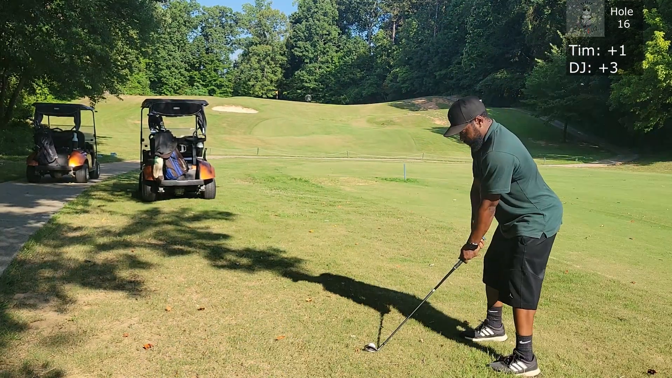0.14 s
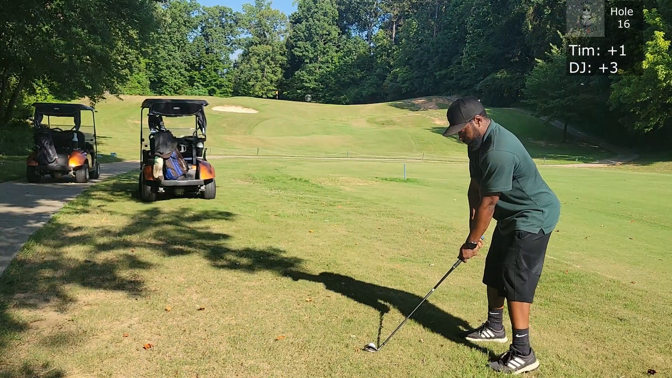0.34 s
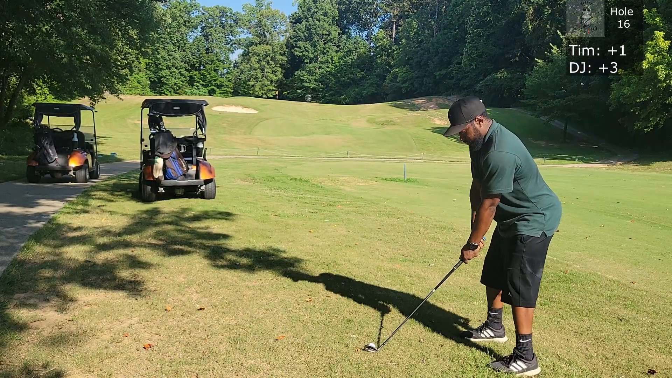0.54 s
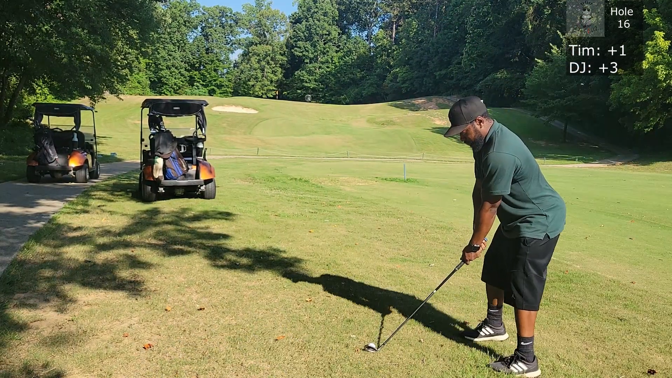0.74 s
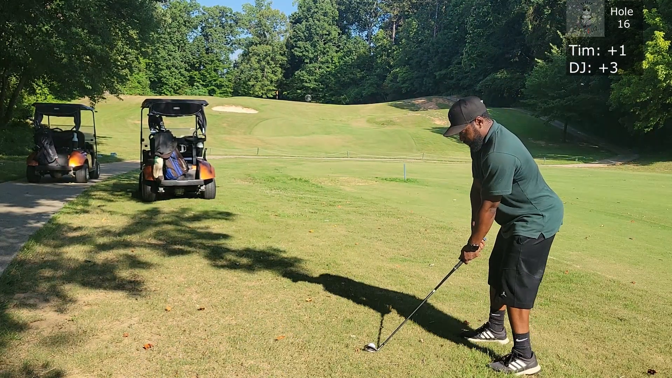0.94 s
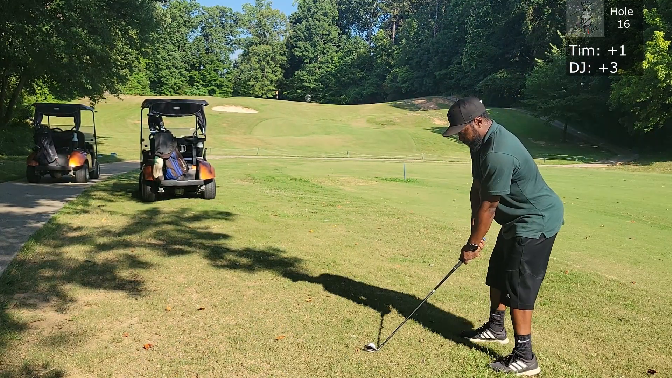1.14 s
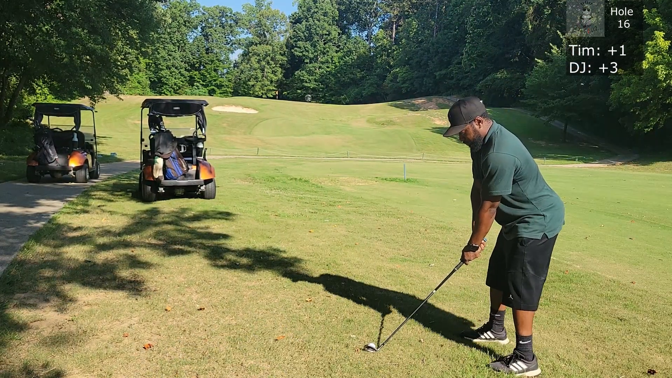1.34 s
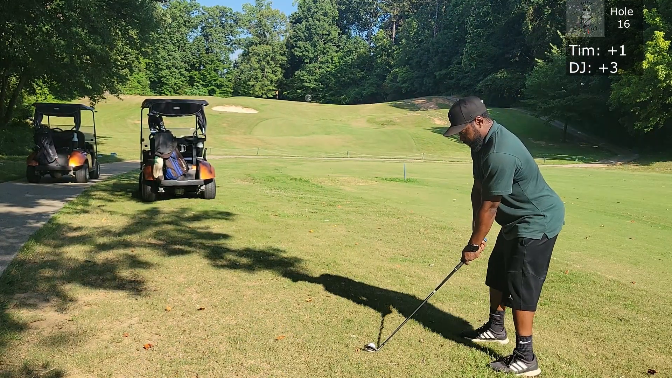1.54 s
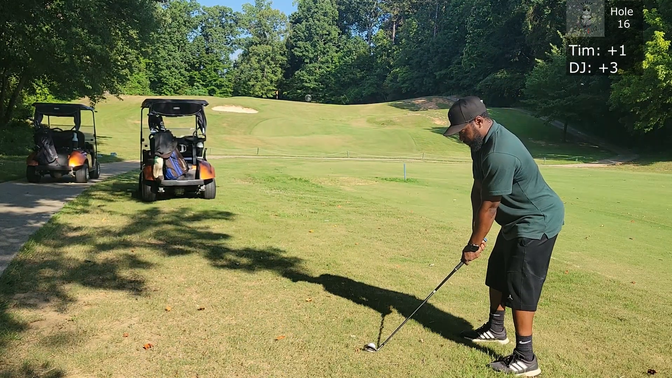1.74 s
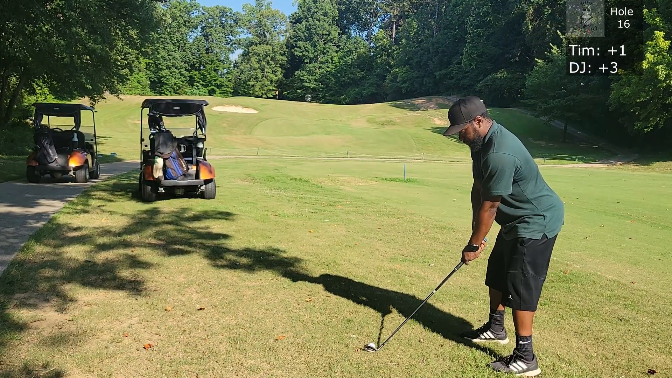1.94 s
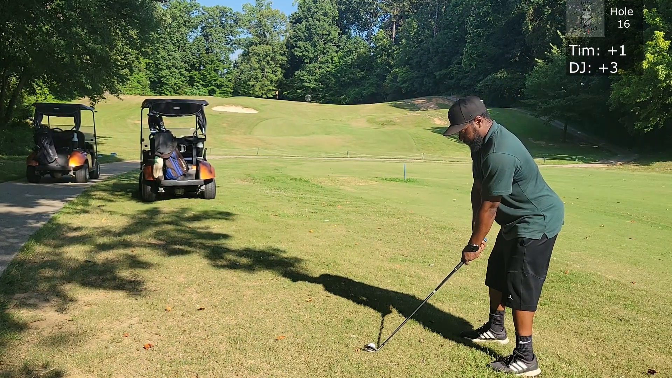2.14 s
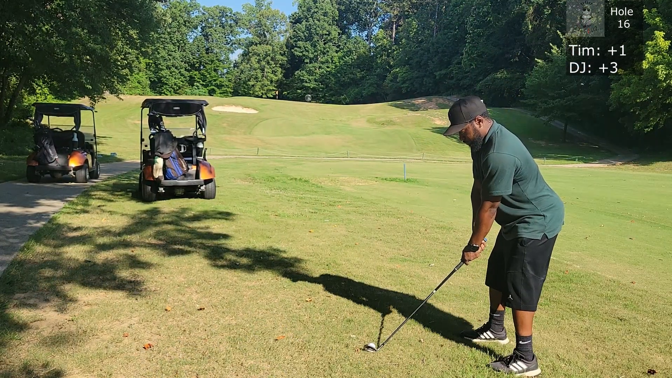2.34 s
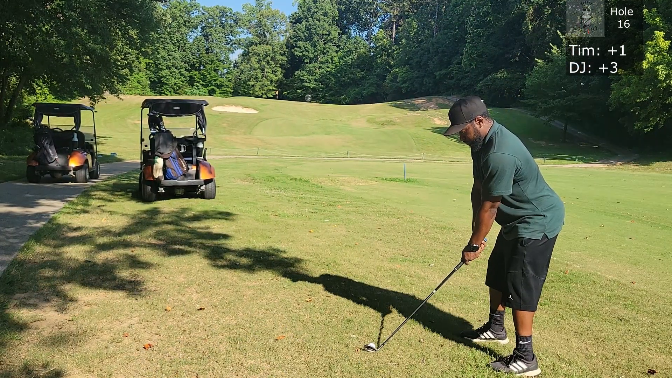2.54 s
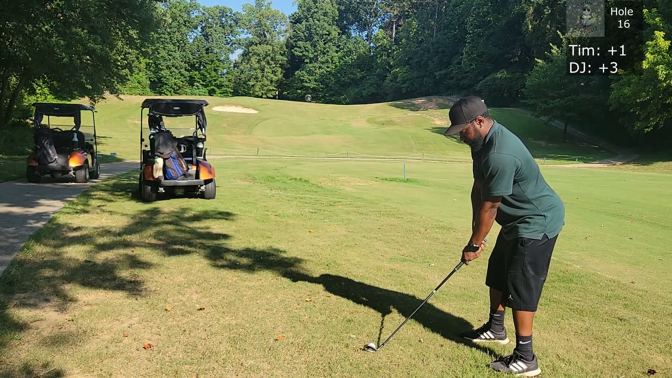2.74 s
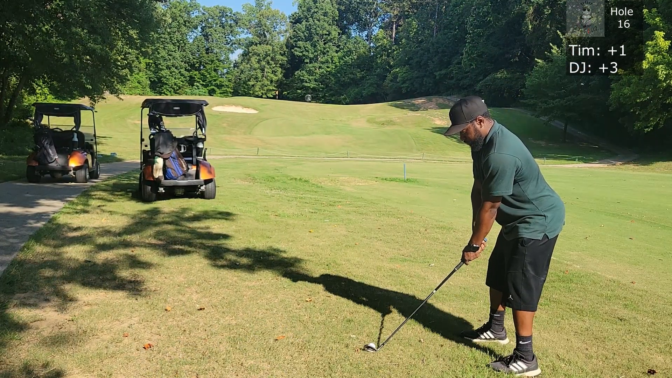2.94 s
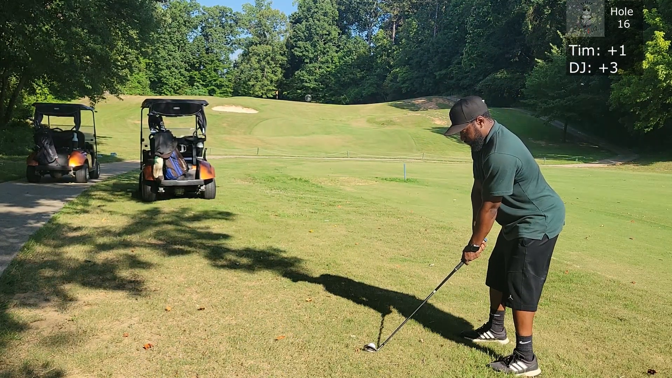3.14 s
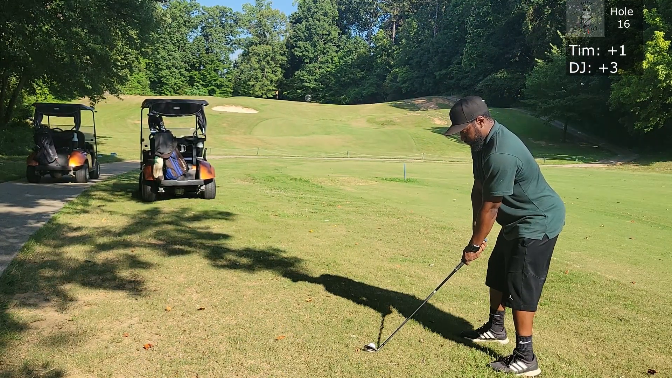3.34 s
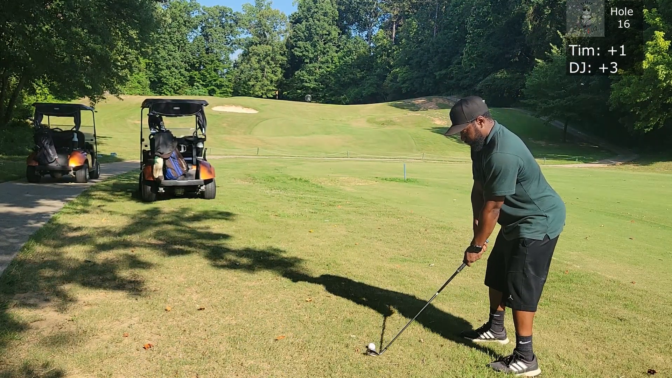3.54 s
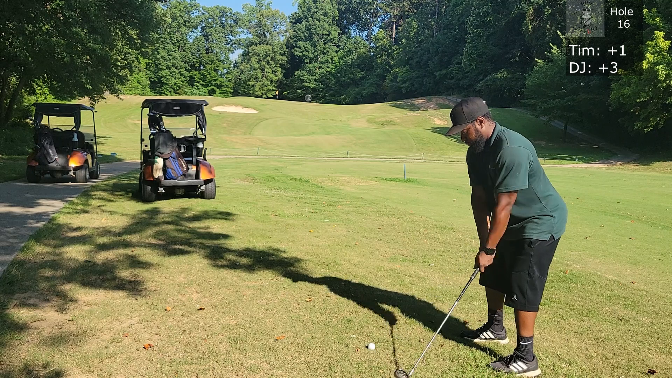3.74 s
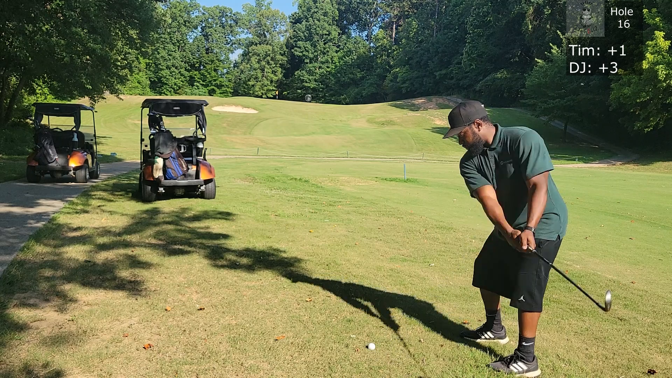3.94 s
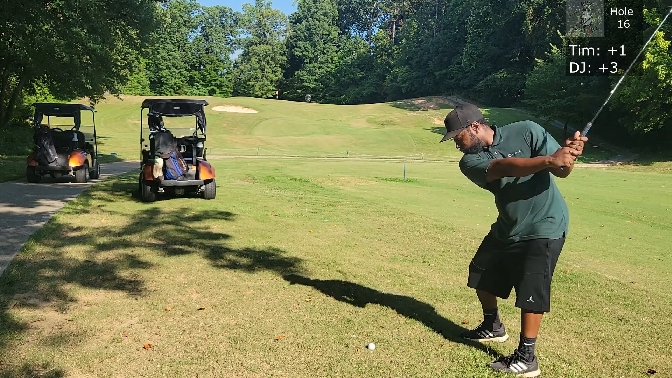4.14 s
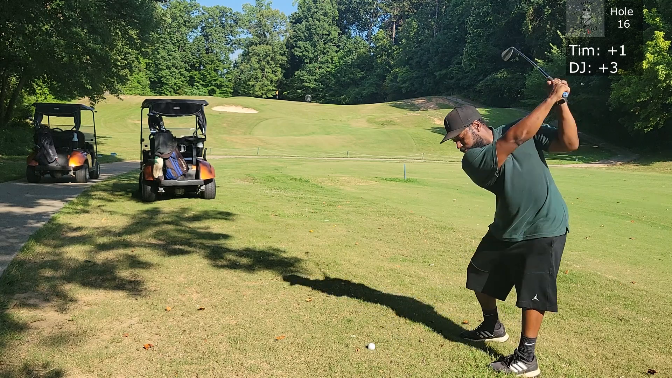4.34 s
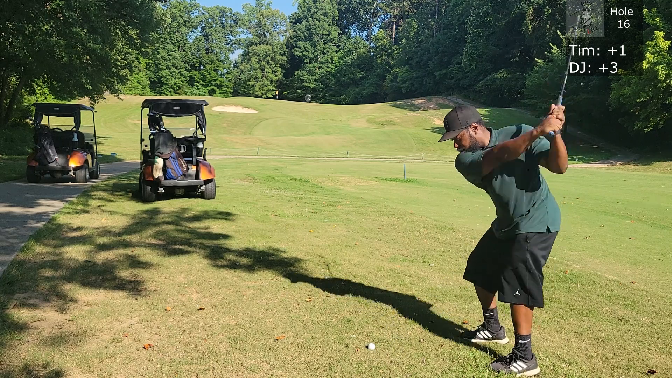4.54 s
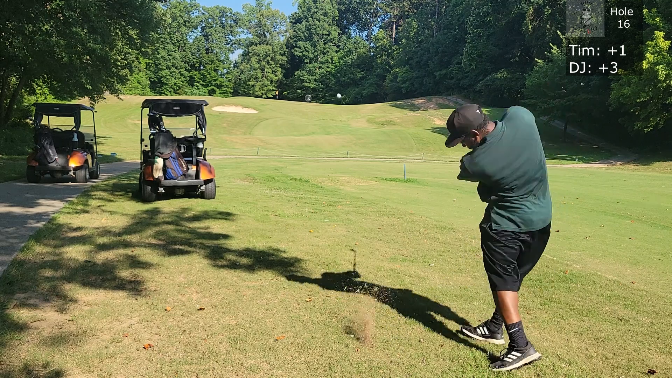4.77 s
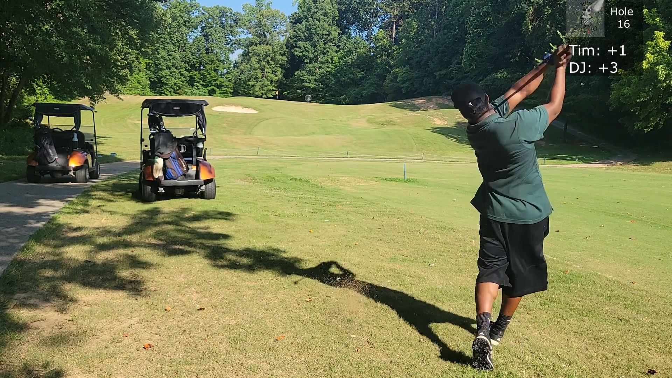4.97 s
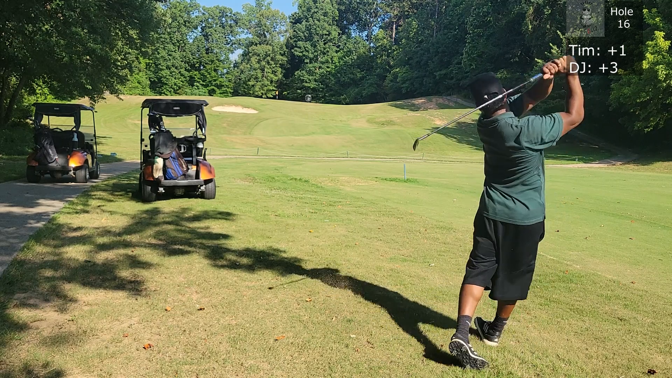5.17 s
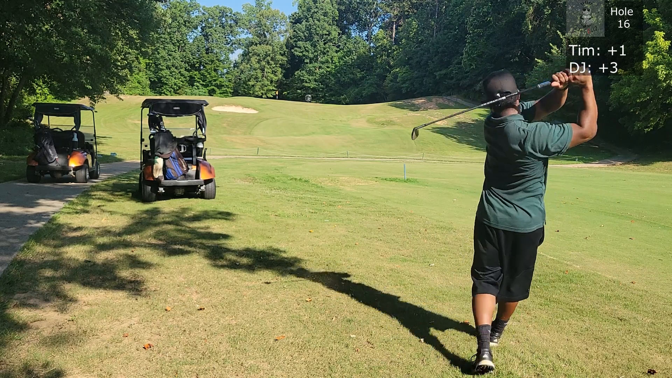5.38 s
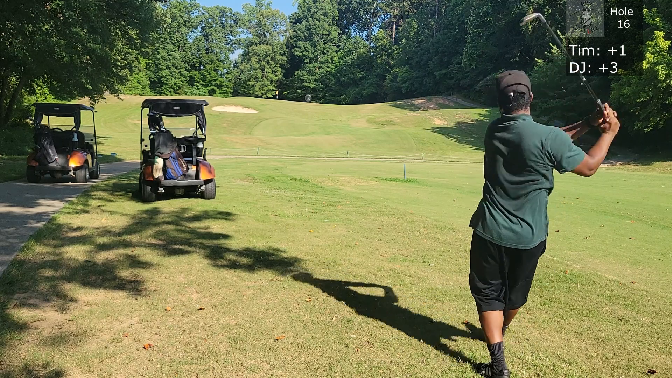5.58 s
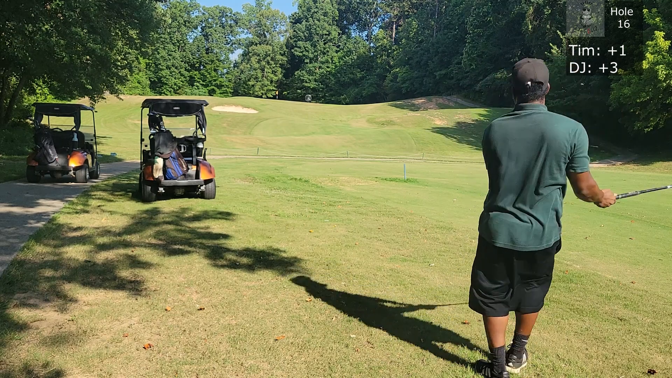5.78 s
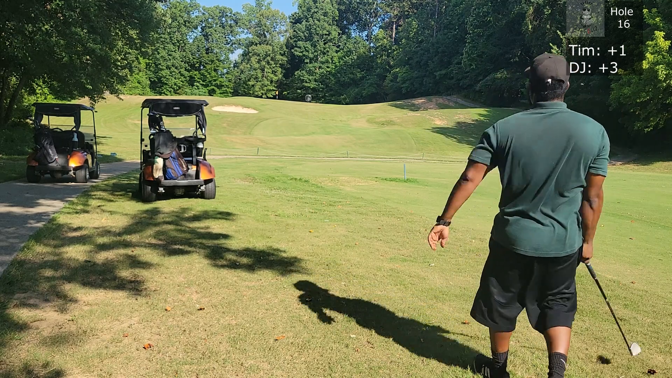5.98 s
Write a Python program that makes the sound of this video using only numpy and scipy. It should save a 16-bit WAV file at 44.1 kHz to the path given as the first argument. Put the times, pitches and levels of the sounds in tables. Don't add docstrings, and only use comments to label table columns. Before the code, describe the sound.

A faint far vehicle drone fades away at the start, leaving a mower hum, steady insects and light breeze. A soft tap on the ground comes in the first half. After a long quiet wait, an iron whooshes briefly and cracks a golf ball off grass, very loud against the background, with torn turf and gritty soil settling. Then only the calm outdoors remains, heard in wide, dry stereo from nearby.

```python
import sys
import numpy as np
from scipy import signal
from scipy.fft import rfft, irfft, next_fast_len
from scipy.io import wavfile
from scipy.ndimage import map_coordinates

SR = 44100
rng = np.random.default_rng(int(sys.argv[2]) if len(sys.argv) > 2 else 0)


def magnitude_from_level(level_db):
    exponent = np.asarray(level_db, float) / 20
    return 10 ** exponent


def inscribe(sig):
    pcm = np.round(np.clip(np.atleast_2d(sig).T, -1, 1) * 32767)
    wavfile.write(sys.argv[1], SR, pcm.astype(np.int16))


N = 265041
T = np.arange(N) / SR

# [f/Hz, density/dB]
CHORUS = [(1470, -35.5), (2500, -15.5), (4270, -9), (5480, -10.5), (6900, -16), (7150, 2), (7400, -4.5),
          (7850, 1), (8300, -1.5), (8800, -13.5), (9300, -29), (10300, -38), (13000, -25.5), (16000, -24)]
# [full from t/s, until t/s, level/dB]
LEAVES = [
    (2.9, 3.2, -80),
    (4.7, 5.05, -79),
    (5.6, 6.1, -76.5),
]
# [t/s, cycle f/Hz]
SPEED = [(0, 9.045), (1.1, 9.048), (1.4, 9.056), (3.4, 9.056), (3.7, 9.033), (6.1, 9.03)]
ORDER = [4, 6, 8, 8.9965, 10, 12, 14, 16, 17.993, 20, 22, 24, 26, 26.99, 28, 30, 32, 34]
ORDER_DB = [-66.5, -60, -64.5, -46, -52.5, -58, -67, -64, -63.5, -66, -69, -72.5, -77.5, -78.5, -81.5,
            -81.5, -84.5, -82.5]
# [t/s, level/dB]
LOAD = [
    (0, 0),
    (1.2, .3),
    (2.5, .6),
    (3.1, -2.5),
    (4.3, -3),
    (4.7, .3),
    (6.01, 0),
]
# [f/Hz, density/dB]
RUMBLE = [(10, -19), (24, -19), (33, -28), (50, -2), (65, 0), (100, -5), (180, -5.5), (215, -16),
          (320, -33.5), (500, -55)]
# [f/Hz, density/dB]
HUM = [(160, -36), (270, -6), (371, -0.5), (494, -5), (739, -1.5), (904, -1.5), (994, -7), (1170, -2.5),
       (1300, -7.5), (2160, -13), (3400, -17.5), (4420, -38), (7480, -120)]
# [f/Hz, left-right likeness]
HUM_ALIKE = [(60, 0.938), (130, 0.454), (290, 0.4978), (640, -0.0762), (1410, -0.0585), (3100, -0.2175),
             (6820, 0.037), (15000, 0.01)]
# [t/s, f/Hz, level/dB]
TRUCK = [
    (-.1, 62.45, -45.5),
    (.6, 61.73, -49),
    (1.1, 59.53, -55.5),
    (1.5, 57.94, -73),
]
# [t/s, peak level/dB]
CICADA = [(.29, -59), (1.46, -59), (2.57, -58.5), (3.68, -58), (4.85, -58), (6.02, -58.5)]
# [f/Hz, width/Hz, level/dB]
TYMBAL = [(3976.2, 537.7, -1.5), (4763.3, 626.3, 0), (5721, 880, 1.2), (7298.7, 810, -8.5)]
# [full from t/s, until t/s, level/dB]
KATYDID = [
    (.03, .4, -74.5),
    (.88, 1.6, -66.5),
    (2.58, 3.1, -67.5),
    (3.1, 4.55, -71.5),
    (4.72, 5.52, -67.5),
    (5.81, 5.86, -69),
    (5.99, 6.1, -67),
]
# [t/s, peak level/dB]
TICKS = [(0.0368, -59), (0.385, -56), (0.4733, -56.5), (0.5467, -54), (0.609, -55), (0.6669, -54.5),
         (2.0228, -54), (2.105, -54.5), (2.1949, -55), (2.2623, -53), (2.3236, -52.5), (2.393, -52.5),
         (2.4558, -55.5), (4.0094, -57), (4.0761, -56), (4.146, -53.5), (4.2113, -54.5), (4.2752, -57),
         (4.3331, -54), (4.3909, -53.5), (4.4458, -52), (4.5032, -53)]
# [f/Hz, density/dB]
WING = [(5760, -43.5), (9800, -19), (11200, -11.5), (12200, -5), (13400, -1), (15100, 1.5), (15900, -2.5)]
# [full from t/s, until t/s, level/dB, rise/(dB/s),
# fall/(dB/s)]
SWISH = (4.695, 4.75, -58, 140, 100)
GRAZE = (4.77, 4.783, -42, 380, 200)
TEAR = (4.7952, 4.7972, -22.5, 4000, 2000)
DUST = (4.806, 4.822, -44, 1500, 300)
SCATTER = (4.812, 4.838, -36, 900, 175)
TREELINE_ECHO = (4.93, 4.96, -57, 300, 55)
# [f/Hz, density/dB]
TURF = [(250, -30), (450, -13.5), (700, 0.5), (1200, 0.2), (2800, -2.5), (5000, -8), (9000, -17),
        (15000, -14.5), (17000, -25)]
# [f/Hz, density/dB]
SPRAY = [(180, -33.5), (300, -3), (511, -11), (1120, -15), (1230, -10), (1430, -13), (2930, -2.5),
         (3400, -3), (6300, -10), (16000, -22)]
# [f/Hz, density/dB]
FINE = [(3000, -30), (5000, -4), (9000, -2), (15500, 0.5)]
# [t/s, f/Hz, level/dB]
SHAFT = [(4.69, 317, -72), (4.715, 368, -51), (4.74, 470, -48.5), (4.765, 566.6, -40.5),
         (4.79, 672.2, -47.5), (4.81, 485, -54), (4.85, 468, -53.5), (4.89, 399.3, -72.5)]
# [t/s, f/Hz, level/dB]
FLIGHT = [
    (4.805, 3120, -70),
    (4.822, 3056, -41.5),
    (4.87, 2930, -50),
    (4.96, 2846, -60),
    (5.04, 2810, -78),
]
# [f/Hz, level/dB, t60/s]
SQUASH = [(1550, 7.5, .0017), (5200, -4.5, .0024), (8000, -5.5, .0024), (11000, -11, .003),
          (14800, -16, .003)]
# [f/Hz, level/dB, t60/s]
RELEASE = [(690, -17, .017), (1170, -6, .0046), (2520, -15, .009), (3500, -18, .006)]
# [left delay t/s, right delay t/s, left level/dB, right level/dB]
BOUNCES = [
    (.0031, .0021, -5, -10),
    (.0042, .0028, -12, -10),
    (.0058, .0034, -16, -15),
]
# [t/s, f/Hz, level/dB, t60/s]
THUDS = [
    (4.7955, 110, -24, .05),
    (4.796, 200, -30, .03),
    (2.1985, 400, -36.5, .016),
    (2.1985, 700, -36, .012),
]
# [f/Hz, left gain/dB, the right one opposite]
FACING = [(1000, -0.5), (4400, -1), (8000, 2.2), (15000, 3.5)]

GUST_RISE_DB_PER_S, GUST_FALL_DB_PER_S, CALM_DB = 24, 32, -88
RUMBLE_DB, HUM_DB = -53, -58
LEAD = 5
SWELL_HOLD_S, SWELL_RISE_DB_PER_S, SWELL_BREAK_DB_PER_S = .22, 32, 95
MURMUR_DB, MURMUR_S, MURMUR_FADE_DB_PER_S = -7.5, .25, 70
SLOW_PER_S, FAST_PER_S, SPEEDUP_S = 58, 76, .6
BUZZ_RISE_DB_PER_S, BUZZ_FALL_DB_PER_S, BUZZ_REST_DB, BUZZ_DEPTH = 21, 110, -83, .33
FLICK_RISE_DB_PER_S = 250
TICK_DB = 1.5
GRAZE_TOP_HZ = 4000
BLOW_S, CONTACT_S = 4.79371, .00033
CLICK_TOP_HZ, CLICK_EDGE_HZ, TOP_HZ = 16950, 700, 15830
CEILING, KNEE = .96, 8


def unit(x):
    return x / np.sqrt(np.mean(x ** 2) + 1e-20)


def along(points, hz):
    f, v = np.transpose(points)
    return np.interp(np.log(hz + 1), np.log(f + 1), v)


def curves(rows):
    s, *cols = np.transpose(rows)
    return [np.interp(T, s, c) for c in cols]


def held(start, end, db, rise, fall):
    return db - rise * np.maximum(start - T, 0) - fall * np.maximum(T - end, 0)


def wobble(rate):
    return map_coordinates(rng.standard_normal(int(N * rate / SR) + 4), [T * rate])


def filtered(x, response):
    m = next_fast_len(N + SR // 2)
    return irfft(rfft(x, m) * response(np.fft.rfftfreq(m, 1 / SR)), m)[..., :N]


def rush(spectrum, alike):
    def gains(hz):
        turn = np.arccos(np.clip(along(alike, hz), -1, 1)) / 2
        return magnitude_from_level(along(spectrum, hz)) * [np.cos(turn), np.sin(turn)]

    mid, side = filtered(rng.standard_normal((2, N)), gains)
    return unit(np.array([mid + side, mid - side]))


def pan(db):
    return magnitude_from_level([[db / 2], [-db / 2]])


def throb(rate, depth, sharp):
    beat = (.5 + .5 * np.cos(2 * np.pi * np.cumsum(rate) / SR)) ** sharp
    return unit(1 - depth + depth * beat)


def ring(s, modes, attack):
    out, first = np.zeros(N), int(s * SR) + 1
    t = T[first:first + SR // 8] - s
    modal = sum(magnitude_from_level(db - 60 * t / t60) * np.sin(2 * np.pi * hz * t) for hz, db, t60 in modes)
    out[first:first + len(t)] = modal * (1 - np.exp(-t / attack))
    return out


def whistle(rows, width_hz, spread):
    hz, db = curves(rows)
    on = (T > rows[0][0]) & (T < rows[-1][0])
    flutter = np.array([wobble(width_hz) + 1j * wobble(width_hz) for _ in range(2)])
    common, apart = (flutter * np.exp(2j * np.pi * np.cumsum(hz) / SR)).real
    return on * magnitude_from_level(db) * (common + spread * np.array([apart, -apart]))


def chorus():
    tilt = [(4000, -1.0), (6000, -2.5), (9000, 3.5), (15000, -3.5)]
    sides = lambda hz: magnitude_from_level(along(tilt, hz) * [[1], [-1]])
    return magnitude_from_level(-58 + 0.5921 * wobble(5.9911)) * filtered(rush(CHORUS, [(1000, 0.0429)]), sides)


def leaves():
    gusts = [held(*row, GUST_RISE_DB_PER_S, GUST_FALL_DB_PER_S) for row in LEAVES]
    hiss = rush([(7000, -39.5), (9000, 1), (12000, -1.5), (14000, -17.5)], [(9000, .05)])
    return magnitude_from_level(np.maximum(np.max(gusts, axis=0), CALM_DB)) * hiss * pan(3.63)


def vehicle():
    return whistle(TRUCK, width_hz=2.8, spread=0.23)


def mower():
    load_db = curves(LOAD)[0]
    cycle = 2 * np.pi * np.cumsum(curves(SPEED)[0]) / SR + 1.6
    drift = np.array([wobble(5.5) for _ in range(3)])
    tones = 0
    for i, (k, db) in enumerate(zip(ORDER, ORDER_DB)):
        blade = k != round(k)
        flicker_db = (1.5 + .12 * k) * drift[i % 3]
        phase = (k > 10) * 2 * np.pi * rng.random()
        tones = tones + magnitude_from_level(db + 2.1 + blade * load_db + flicker_db) * np.cos(k * cycle + phase)
    engine = np.array([np.roll(tones, -LEAD), np.roll(tones, LEAD)])
    rumble_alike = [(30, .8), (60, 0.738), (200, 0.9546), (400, .5)]
    rumble = magnitude_from_level(RUMBLE_DB + 1.2 * wobble(1.5)) * rush(RUMBLE, rumble_alike)
    hum = magnitude_from_level(HUM_DB) * rush(HUM, HUM_ALIKE)
    return (engine + rumble) * pan(-1.1) + hum * pan(-1.18)


def cicada():
    def body(f):
        modes = 0
        for k, (c, w, db) in enumerate(TYMBAL):
            modes = modes + (-1) ** k * magnitude_from_level(db) * 1j * f * w / (c * c - f * f + 1j * f * w)
        return modes

    pulse_rows, levels = [], []
    for s, db in CICADA:
        pulse_rows += [(s - SPEEDUP_S, SLOW_PER_S), (s, FAST_PER_S)]
        levels.append(held(s - SWELL_HOLD_S, s, db, SWELL_RISE_DB_PER_S, SWELL_BREAK_DB_PER_S))
        levels.append(held(s, s + MURMUR_S, db + MURMUR_DB, SWELL_BREAK_DB_PER_S, MURMUR_FADE_DB_PER_S))
    rate = curves(pulse_rows)[0] * (1 + .03 * wobble(20))
    rattle = throb(rate, depth=.46, sharp=.99) * rng.standard_normal((2, N))
    song = unit(filtered(filtered(rattle, body), body))
    return magnitude_from_level(np.max(levels, axis=0) + 4.1) * song * pan(-6.0)


def katydid():
    buzzes = []
    for s, end, db in KATYDID:
        rise = BUZZ_RISE_DB_PER_S if end - s > .2 else FLICK_RISE_DB_PER_S
        buzzes.append(held(s, end, db, rise, BUZZ_FALL_DB_PER_S))
    buzz_db = np.maximum(np.max(buzzes, axis=0), BUZZ_REST_DB)
    buzz = magnitude_from_level(buzz_db + 6.7) * throb(np.full(N, 53.2), BUZZ_DEPTH, sharp=1.3)
    t = T[:SR // 20]
    stroke = magnitude_from_level(-60 * t / 0.035) * np.minimum(t / 0.0024, 1)
    starts = np.bincount([round(s * SR) for s, _ in TICKS], [magnitude_from_level(db + TICK_DB) for _, db in TICKS], N)
    ticks = signal.fftconvolve(starts, stroke)[:N]
    return np.hypot(buzz, ticks) * rush(WING, [(10000, 0.071)]) * pan(6.17)


def divot():
    grit = magnitude_from_level(2.28 * wobble(900) + 1.3 * wobble(230))
    turf = rush(TURF, [(500, 0.807), (3000, 0.24)])
    dull = filtered(turf, lambda hz: 1 / (1 + (hz / GRAZE_TOP_HZ) ** 2))
    graze = np.hypot(magnitude_from_level(held(*SWISH)), magnitude_from_level(held(*GRAZE))) * dull
    tear = magnitude_from_level(held(*TEAR)) * turf
    soil = rush(SPRAY, [(500, 0.46), (3000, 0.16)])
    spray = np.hypot(magnitude_from_level(held(*SCATTER)), magnitude_from_level(held(*TREELINE_ECHO))) * soil
    dust = magnitude_from_level(held(*DUST)) * rush(FINE, [(5000, .2)])
    return graze + grit * (tear + spray + dust)


def ball():
    return whistle(FLIGHT, width_hz=350, spread=0.73)


def shaft():
    return whistle(SHAFT, width_hz=170, spread=.55)


def click(s, squash):
    return ring(s + CONTACT_S, RELEASE, attack=.00012) - squash * ring(s, SQUASH, attack=.00012)


def strike():
    direct = np.array([click(BLOW_S + .00004, .88), click(BLOW_S, 1.1)])
    left = sum(magnitude_from_level(db) * click(BLOW_S + s, 0.774) for s, _, db, _ in BOUNCES)
    right = sum(magnitude_from_level(db) * click(BLOW_S + s, 1.0) for _, s, _, db in BOUNCES)
    thud = sum(ring(s, [mode], attack=.0012) for s, *mode in THUDS)
    small_head = signal.butter(2, 400, "high", fs=SR, output="sos")
    ground = signal.butter(2, 60, "high", fs=SR, output="sos")
    return signal.sosfilt(small_head, direct + [left, right]) + signal.sosfilt(ground, thud)


def scene():
    facing = lambda hz: magnitude_from_level(along(FACING, hz) * [[1], [-1]])
    band = lambda hz: hz < TOP_HZ
    click_band = lambda hz: np.clip((CLICK_TOP_HZ - hz) / CLICK_EDGE_HZ, 0, 1) ** 2
    field = chorus() + leaves() + vehicle() + mower() + cicada() + katydid()
    far = filtered(field + ball() + shaft(), band)
    soil = filtered(divot(), lambda hz: facing(hz) * band(hz))
    blow = filtered(strike(), lambda hz: facing(hz) * click_band(hz))
    return far + soil + blow


def band_limit(x):
    return signal.sosfilt(signal.butter(12, 16990, fs=SR, output="sos"), x)


def record(dry):
    rounded = dry / (1 + np.abs(dry / CEILING) ** KNEE) ** (1 / KNEE)
    return band_limit(rounded)


dry = scene()
out = record(dry)
inscribe(out)
```